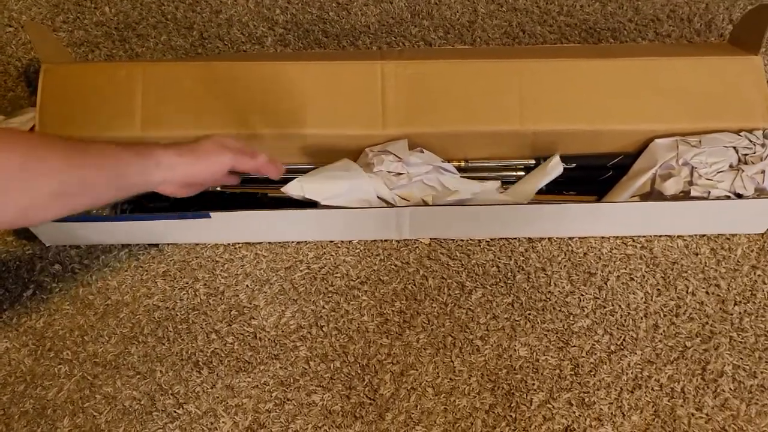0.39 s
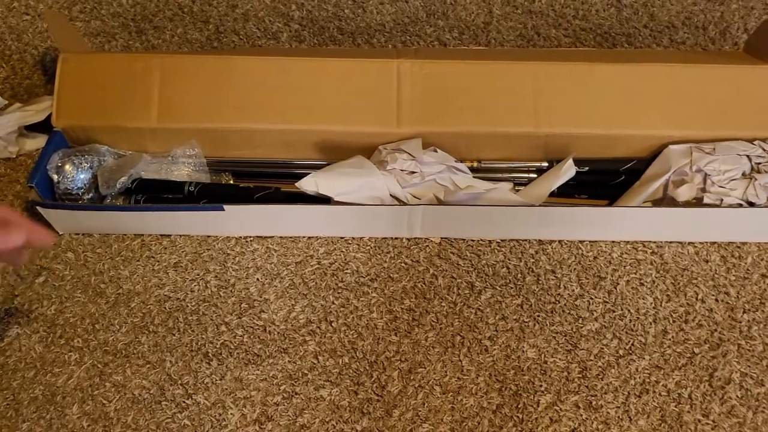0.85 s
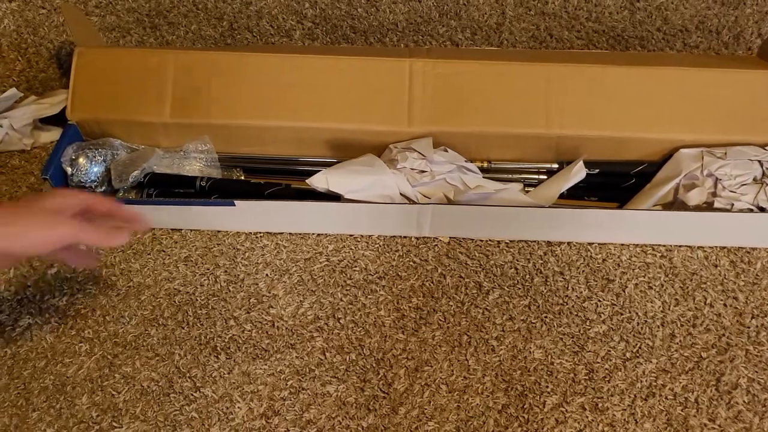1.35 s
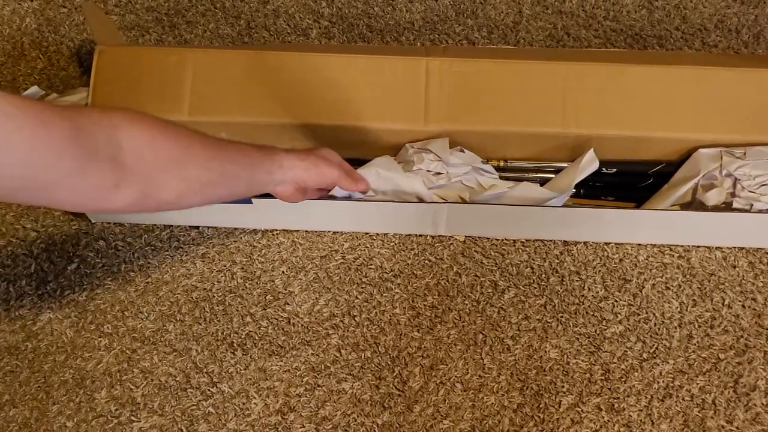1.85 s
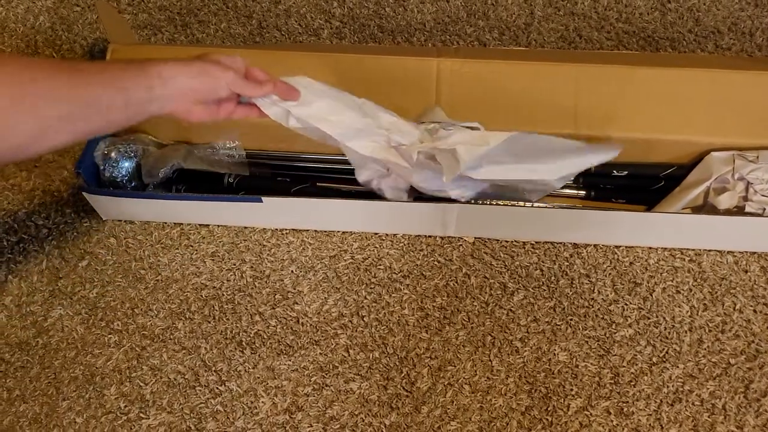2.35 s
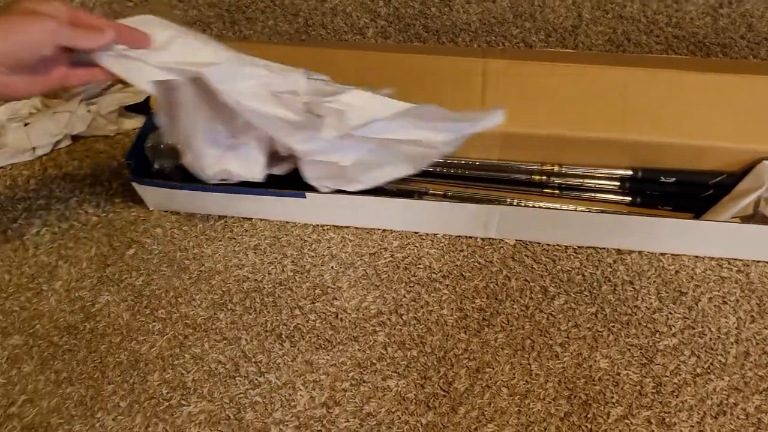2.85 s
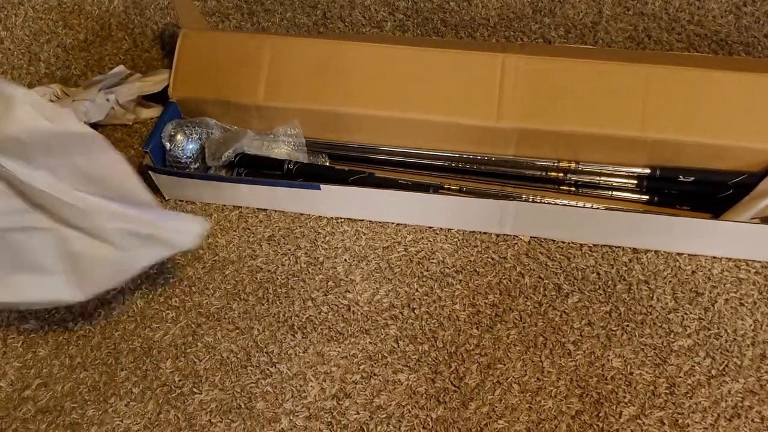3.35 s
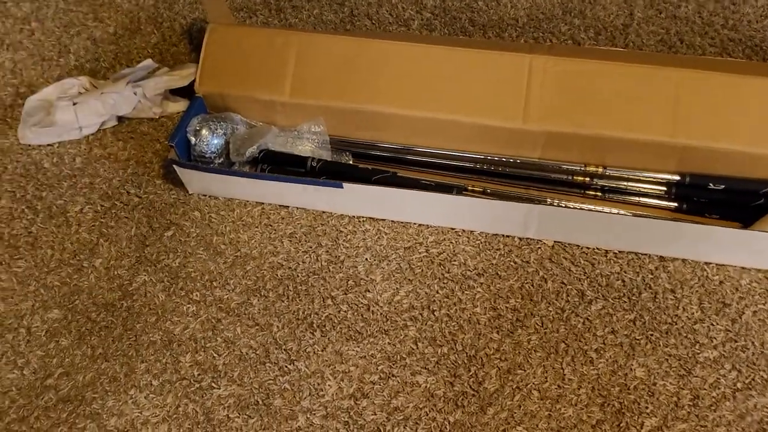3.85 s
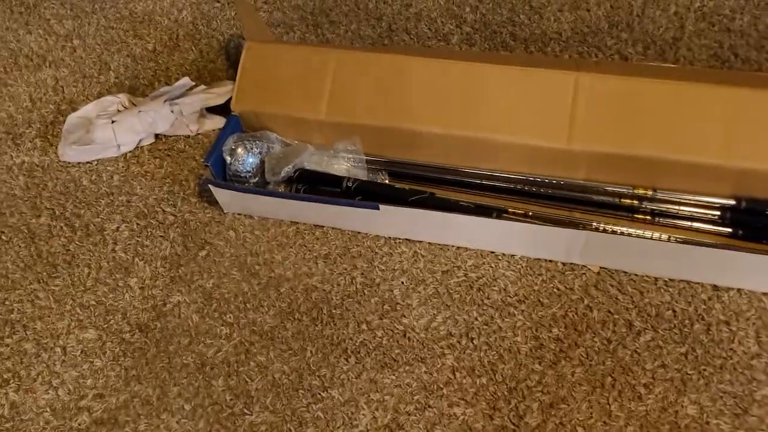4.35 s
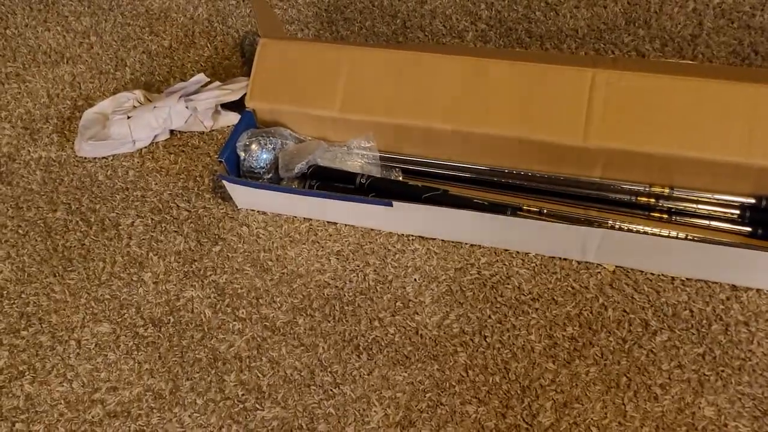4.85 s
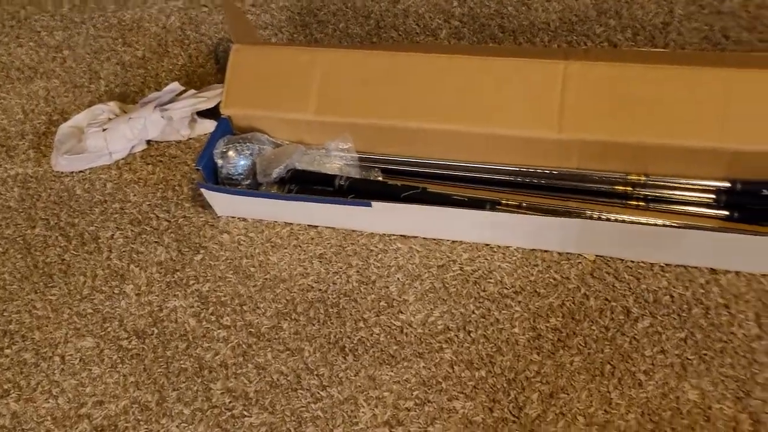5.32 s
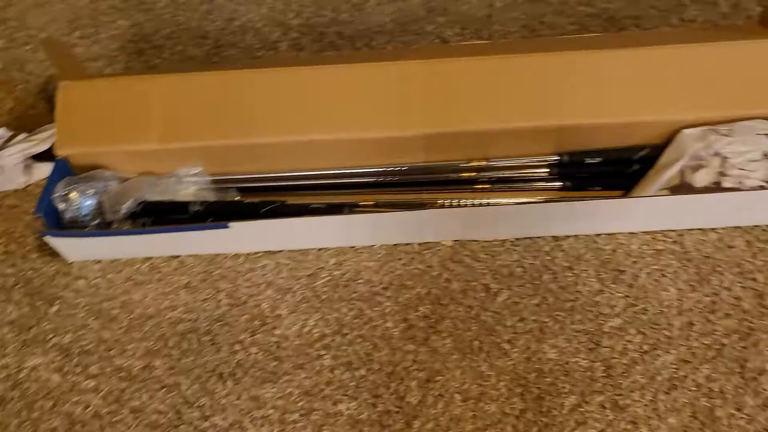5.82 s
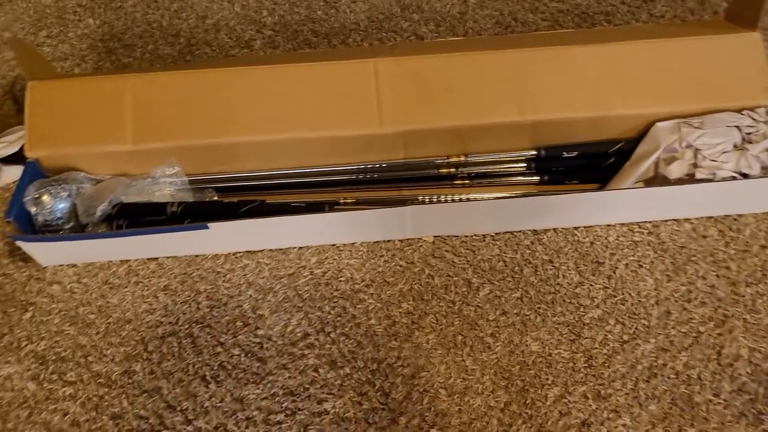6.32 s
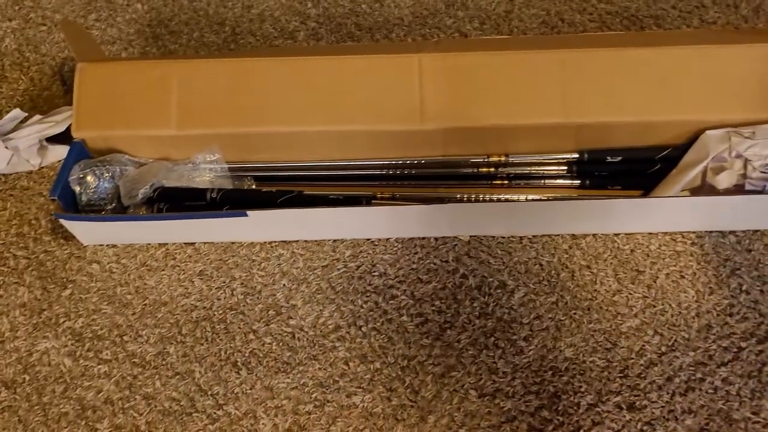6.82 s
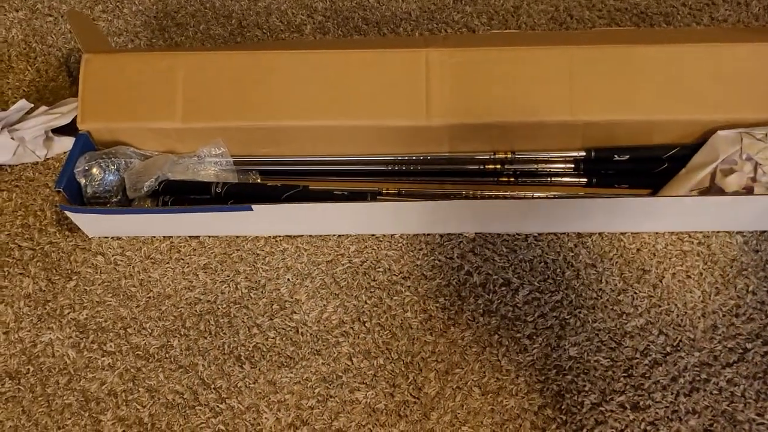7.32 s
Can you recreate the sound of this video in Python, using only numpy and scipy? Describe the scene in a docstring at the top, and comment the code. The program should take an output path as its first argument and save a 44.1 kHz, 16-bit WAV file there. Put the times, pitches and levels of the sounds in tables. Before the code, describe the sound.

Close, crisp paper crinkling with sharp snaps and dull box bumps, then scattered light ticks and soft knocks over faint room hum.

```python
"""A quiet furnished room hums and rumbles under two faint tones, then packing paper bursts into crackle.
A hand pulls it crumpled out of a long cardboard box on a carpet, close to a pair of microphones.
Creases are banded noise in clumps of tiny cracks and louder snaps; stiff flats of paper are brief rings.
Thumps of the box are pairs of decaying sines, squeaks are fluttering sines, and the house is shaped noise
with a wavering hum. A short dense echo surrounds the paper and the box."""
import sys
import numpy as np
from scipy import signal
from scipy.fft import rfft, irfft, next_fast_len
from scipy.io import wavfile
from scipy.ndimage import uniform_filter1d

SR = 44100
rng = np.random.default_rng(int(sys.argv[2]) if len(sys.argv) > 2 else 0)


def master_out(mix):
    """Clip the mix to full scale and print it as 16-bit PCM to the path in sys.argv[1]."""
    frames = np.transpose(np.atleast_2d(mix))
    ceiling = np.clip(frames, -1, 1)
    pcm = np.round(ceiling * 32767).astype(np.int16)
    wavfile.write(sys.argv[1], SR, pcm)


def volts(x):
    """Linear amplitude factor 10**(x/20) for a level x in dB, scalar or array-like."""
    e = np.asarray(x, float) / 20
    return 10 ** e


N = 339129   # length in samples


def unit_rms(x):
    """Scale a signal to unit rms."""
    return x / np.sqrt(np.mean(x ** 2) + 1e-20)


def at_hz(points, hz):
    """Read a (Hz, value) table on a log-frequency axis."""
    table_hz, values = np.transpose(points)
    return np.interp(np.log(hz), np.log(table_hz), values)


def drift(rate_hz):
    """Random wander of unit rms: noise through a two-pole low-pass, made at 200 points a second."""
    control_rate, settle = 200, 400
    steps = int(N / SR * control_rate) + settle + 2
    r = np.exp(-2 * np.pi * rate_hz / control_rate)
    slow = signal.lfilter([1], [1, -2 * r, r * r], rng.standard_normal(steps))[settle:]
    return np.interp(np.arange(N) * control_rate / SR, np.arange(len(slow)), unit_rms(slow))


def die(clicks, t60_s):
    """Turn every click into a jump that dies away exponentially by 60 dB in t60_s."""
    return signal.lfilter([1], [1, -volts(-60 / (t60_s * SR))], clicks + 1e-18)


def pair(noise, alike):
    """Mix two unrelated noises into left and right with the given likeness (correlation)."""
    alike = np.clip(alike, -.99, .99)
    shared = np.sqrt(1 + alike) * noise[0]
    opposed = np.sqrt(1 - alike) * noise[1] * np.array([[1], [-1]])
    return (shared + opposed) / np.sqrt(2)


def panned(db):
    """Gains of left and right for a left-right level difference in dB."""
    return volts(np.array([db / 2, -db / 2]))


# Colour of the room's bed of noise. Each row: frequency in Hz, relative density in dB per Hz.
HOUSE_COLOUR = [(20, -9), (40, -7), (65, 12), (100, 3.5), (150, -11), (230, -4.5), (400, -5.5), (900, -16),
                (2400, -21), (4000, -46.5), (7500, -19.5), (8600, -45.5), (16000, -50)]
# Stereo width of that bed. Each row: frequency in Hz, left-right likeness from -1 to 1.
HOUSE_LIKENESS = [(60, .96), (150, .9), (380, .9), (950, -.3), (2380, -.6), (5980, 0), (15000, .25)]
# Hum tones. Each row: frequency in Hz, middle level in dB, rate of the level's waver in Hz.
HUM_TONES = [(125.5, -70.5, 6), (239.3, -63, 10)]


def house(waver_db=2.5):
    """Rumble and hiss as noise shaped in frequency, under sines whose level and phase wander."""
    size = next_fast_len(N)
    hz = np.maximum(np.arange(size // 2 + 1) * SR / size, 1)
    spectra = rfft(rng.standard_normal((2, size))) * volts(at_hz(HOUSE_COLOUR, hz))
    bed = irfft(pair(spectra, at_hz(HOUSE_LIKENESS, hz)), size)[:, :N]
    out = volts(-59.5) * unit_rms(bed)
    for hum_hz, db, waver_hz in HUM_TONES:
        level = volts(db + waver_db * drift(waver_hz))
        phase = 2 * np.pi * hum_hz * np.arange(N) / SR + 1.2 * drift(3.8)
        out += level * np.sin(phase)
    return out


def room(x, shared_hz=600):
    """Dense echoes after a short gap; long waves reach both sides alike and the treble dies first."""
    t60_s, treble_t60_s, gap_s, level_db = 0.36, 0.13, .004, -9
    t = np.arange(SR // 2) / SR
    echoes = rng.standard_normal((2, len(t))) * (t > gap_s)
    bass = signal.sosfilt(signal.butter(2, shared_hz, fs=SR, output="sos"), echoes)
    echoes[1] += bass[0] - bass[1]   # the right side takes the left side's bass
    dull = signal.lfilter([.35], [1, -.65], echoes)
    treble = echoes - dull
    tail = dull * volts(-60 * t / t60_s) + treble * volts(-60 * t / treble_t60_s)
    tail /= np.sqrt(np.sum(tail ** 2) / 2)
    return volts(level_db) * signal.fftconvolve(x, tail, axes=1)[:, :N]


# Faint short tones. Each row: start in seconds, pitch in Hz, relative level in dB, length in seconds.
SQUEAK_TONES = [(0.0, 1560, -66, 0.12), (0.01, 2930, -73, 0.11), (1.237, 4530, -53.5, 0.01),
                (2.93, 1475, -40.5, 0.043), (3.058, 295, -47, 0.03), (6.676, 2300, -53, 0.019)]


def squeaks(rough=.4):
    """Soft sines under a half-sine swell, with a quick random flutter of the level."""
    out = np.zeros(N)
    for s, hz, db, length in SQUEAK_TONES:
        t = np.arange(int(length * SR)) / SR
        i = round(s * SR)
        swell = np.sin(np.pi * t / length)
        out[i:i + len(t)] += volts(db) * swell * np.sin(2 * np.pi * hz * t)
    return out * (1 - rough + rough * drift(60))


# Dull knocks on the cardboard. Each row: start in seconds, relative level in dB, lower mode in Hz.
BOX_KNOCKS = [(0.157, -41, 324), (0.699, -39.5, 106), (2.158, -23.5, 330), (2.448, -35, 315),
              (3.148, -38.5, 481), (4.39, -34, 97), (4.629, -38, 579), (5.605, -36, 93), (5.651, -34, 73.5),
              (5.927, -47.5, 450), (6.265, -45, 480), (6.27, -39.5, 233), (6.284, -46, 382),
              (7.079, -36, 269), (7.096, -34, 337), (7.119, -36.5, 369), (7.139, -54, 415),
              (7.211, -34.5, 310), (7.239, -35.5, 177), (7.341, -38, 436), (7.369, -39, 447),
              (7.428, -33, 353), (7.449, -47, 396), (7.598, -41.5, 330)]


def thumps(slap_db=-14):
    """A push sets two neighbouring panel modes of the box ringing, with a short slap on top."""
    t60_s = 0.08
    out, t = np.zeros(N), np.arange(SR // 4) / SR
    slap_band = signal.butter(2, [500, 1800], "band", fs=SR, output="sos")
    slap = unit_rms(signal.sosfilt(slap_band, rng.standard_normal(N)))
    detunes = rng.uniform(1.18, 1.497, len(BOX_KNOCKS))   # upper mode over lower mode
    for (s, db, hz), detune in zip(BOX_KNOCKS, detunes):
        i = round(s * SR)
        part = t[:N - i]
        ring = np.sin(2 * np.pi * hz * part) + 0.72 * np.sin(2 * np.pi * hz * detune * part)
        swell = 1 - np.exp(-part * hz)   # deep thumps swell more slowly
        push = volts(db - 1 - 60 * part / t60_s) * swell
        slap_gain = volts(slap_db) * (hz / 300) ** 2
        out[i:i + len(t)] += push * (ring + slap_gain * slap[i:i + len(t)])
    return out


# How hard the paper is worked. Each row: time in seconds, relative effort in dB, brightness in dB
# (thin sharp creases are bright, broad folds dull).
PAPER_EFFORT = [(0.0, -59.5, -12), (0.127, -64, -8), (0.15, -38, -12.5), (0.183, -28.5, -0.5),
                (0.254, -31, -3.5), (0.282, -29.5, -3), (0.409, -25, -4.5), (0.444, -33, 0.5),
                (0.471, -25, -3.5), (0.519, -55, 8.5), (0.673, -73.5, 2), (0.738, -65.5, -4),
                (0.776, -63, -4), (0.923, -72, -2), (1.3, -76, 0), (1.823, -69, -4), (1.833, -48, -1),
                (1.862, -38, 0), (1.887, -26.5, 5), (1.968, -28.5, -2), (2.003, -28, 2), (2.028, -21.5, -5),
                (2.08, -22.5, -4), (2.148, -18.5, -4.5), (2.362, -25.5, -1.5), (2.458, -19.5, -4),
                (2.559, -30, -2.5), (2.589, -28.5, -0.5), (2.644, -20.5, -5), (2.691, -33.5, -3),
                (2.761, -39, 0.5), (2.913, -42.5, 1), (3.028, -44.5, 1), (3.139, -35.5, -2.5),
                (3.225, -49.5, 0), (3.274, -47.5, 5.5), (3.43, -57.5, 3.5), (3.554, -48.5, 0),
                (3.637, -38, 3.5), (3.699, -49.5, 8.5), (3.72, -33, -1), (3.76, -36, 2),
                (3.851, -43.5, 4.5), (3.896, -41, 9), (3.929, -52, 9), (3.951, -43, 9), (3.99, -46, 6.5),
                (4.063, -40.5, 4.5), (4.123, -50, 8.5), (4.161, -42.5, -5.5), (4.275, -66.5, 2),
                (4.39, -66, -5), (4.495, -59.5, 1), (4.574, -69, 3), (4.599, -33.5, 2.5),
                (4.624, -34.5, -1), (4.714, -44.5, 4.5), (4.849, -58, 3.5), (5.019, -69, 2.5),
                (5.051, -64, 6), (5.123, -66, -2), (5.271, -63, -1), (5.335, -53, 2), (5.35, -51.5, 9),
                (5.42, -61.5, -3), (5.739, -61.5, -2), (5.912, -67, 1), (5.934, -52, -2),
                (5.994, -61.5, -3), (6.116, -66, -1.5), (6.176, -63.5, 1.5), (6.246, -74.5, 8.5),
                (6.419, -71, 0), (6.695, -67.5, 2), (7.056, -71.5, 4.5), (7.106, -56.5, 12),
                (7.174, -60, 1), (7.251, -50, 2.5), (7.285, -59.5, 0), (7.325, -64, 2), (7.348, -41, -5),
                (7.456, -58, 7.5), (7.488, -48, 8), (7.608, -42.5, 4.5), (7.688, -49, 3.5)]
# How much the paper drags on the cardboard, which adds body. Each row: time in seconds, drag in dB.
BOX_DRAG = [(0, -10), (0.15, 3), (0.19, -4.5), (0.47, 2.5), (0.55, 1), (0.7, 9), (0.776, 2), (0.92, -1.5),
            (1.83, 0.5), (1.9, 4.5), (2.15, 1), (2.36, 0), (2.8, -3.5), (3.14, 1), (3.55, 1.5),
            (3.72, -3.5), (4.1, 2.5), (4.16, 0.5), (4.39, 5), (4.62, 1.5), (4.85, -2), (5.12, 4),
            (5.42, -7), (5.74, 1.5), (5.95, -6), (6.29, 5), (6.7, -0.5), (7.1, 3.5), (7.35, 7.5), (7.49, 8),
            (7.69, 0)]
# Where the paper is heard. Each row: time in seconds, left-right difference in dB, treble in dB
# (more when it faces the microphone ports, less when hidden behind the box).
PAPER_PLACE = [(0, -0.5, 0.5), (1.8, -2, -2), (2.6, -2, 0), (2.9, -1, 5), (3.5, 0.5, -1.5), (4.1, -0.5, 0),
               (4.55, 0, -4.5), (5.4, -2, -5), (5.8, -3, -1), (6.5, -5, 0), (6.9, -5, 4.5), (7.1, -6, -1),
               (7.69, -2.5, -3)]


def handling():
    """Effort, brightness, drag and place of the paper at every sample, turned into levels per band."""
    t = np.arange(N) / SR
    time_s, effort, brightness = np.transpose(PAPER_EFFORT)
    effort_db, bright = np.interp(t, time_s, effort), np.interp(t, time_s, brightness)
    drag = np.interp(t, *np.transpose(BOX_DRAG))
    time_s, side, facing = np.transpose(PAPER_PLACE)
    side_db, facing_db = np.interp(t, time_s, side), np.interp(t, time_s, facing)
    soft = -30 - effort_db   # dB below a full pull
    # band levels against the crinkle, in dB
    crisp_db = -4 + 0.0234 * soft + 0.87 * bright
    treble_db = -12 + .12 * soft + 1.14 * bright + 0.5 * drag + facing_db
    flex_db = -8.5 + 0.2939 * soft - 0.39 * bright + 0.68 * drag
    box_db = -11.5 + .5 * soft - 0.46 * bright + 0.98 * drag
    return effort_db, crisp_db, treble_db, flex_db, box_db, side_db


def facets(per_s=220, cycles=27.0, size_db=3.5, snap_ring_db=-7, crack_ring_db=3):
    """Stiff flats between creases ring briefly: cracks at one of twenty pitches, snaps at their own."""
    left_lag_s = 0.000352   # the ringing reaches the right port first
    crinkle_db, *others, side_db = handling()
    sizes = volts(crinkle_db + crack_ring_db - 12.5 + size_db * np.minimum(rng.exponential(1, N), 3))
    sizes *= (rng.random(N) < per_s / SR) * rng.choice([-1, 1], N)
    dealt, out = rng.integers(0, 20, N), np.zeros(N + SR)
    for k, hz in enumerate(np.geomspace(900, 5000, 20)):
        r, w = volts(-60 * hz / (cycles * SR)), 2 * np.pi * hz / SR   # 60 dB down after the given cycles
        strikes = sizes * (dealt == k) + 1e-18
        out[:N] += signal.lfilter([0, np.sin(w)], [1, -2 * r * np.cos(w), r * r], strikes)
    t = np.arange(SR // 12) / SR
    for s, db, hz, treble_db, t60 in CREASE_SNAPS:
        i = round(s * SR)
        ring_t60 = 0.69 * t60 + cycles / hz / 2
        out[i:i + len(t)] += volts(db + snap_ring_db - 60 * t / ring_t60) * np.sin(2 * np.pi * hz * t)
    late = np.interp(np.arange(N) - left_lag_s * SR, np.arange(N), out[:N])
    return np.array([late, out[:N]]) * panned(side_db)


# Creases that snap; the flats above ring with them too. Each row: start in seconds, relative level in dB,
# brightest frequency in Hz, extra treble in dB, base decay time (t60) in seconds.
CREASE_SNAPS = [(0.1508, -28.5, 7500, -9, .026), (0.1654, -24, 3880, -20, 0.0087),
                (0.1782, -10.5, 2780, 8.5, 0.0026), (0.1878, -15, 7540, 10, 0.0064),
                (0.2252, -19.5, 7550, -15, .018), (0.23, -18.5, 7200, -13, 0.028),
                (0.265, -25.5, 6250, 3, 0.13), (0.2732, -10.5, 1284, -15, 0.044),
                (0.2918, -18, 4900, -27, .012), (0.313, -17, 2540, -11, .007),
                (0.3775, -22, 1490, -13, .025), (0.3953, -22, 3050, -8, .026),
                (0.415, -12, 4000, -9, 0.024), (0.455, -22, 3000, -2.5, 0.023),
                (0.4619, -20, 3080, -4, 0.023), (0.764, -51, 2900, -20, 0.044),
                (0.778, -44, 1400, -26, 0.036), (1.8736, -5, 7730, -16, 0.011),
                (1.8801, -4.5, 4600, -7, 0.01), (1.911, -12.5, 5000, -12, 0.018),
                (1.9356, -10.5, 7300, -15, .0079), (1.9597, -16, 2940, -24, 0.013),
                (2.014, -14.5, 5650, -9, 0.066), (2.0348, -11, 6200, -12, 0.033),
                (2.147, -16, 3240, -22, .02), (2.207, -18, 2830, -14, 0.013),
                (2.225, -18.5, 3050, -14, .012), (2.243, -33, 3180, -9, 0.018),
                (2.3056, -21.5, 2540, -9, 0.043), (2.39, -18, 3140, -15, 0.032),
                (2.404, -14, 2740, -30, 0.02), (2.44, -29, 5500, -3, 0.035),
                (2.465, -19.5, 2570, -12, 0.072), (2.5784, -16.5, 1470, -20, 0.039),
                (2.593, -20, 5660, 7.5, 0.026), (2.6384, -11.5, 2360, -26, 0.016),
                (2.749, -27, 2690, -19, 0.038), (2.9326, -25.5, 2870, -21, 0.029),
                (2.946, -29, 5500, -13, 0.032), (3.183, -31, 1810, -3, 0.044),
                (3.2594, -26, 5600, -15, 0.017), (3.4178, -33.5, 1010, -37, .041),
                (3.4467, -35, 1310, -13, 0.028), (3.498, -26, 7100, -6, 0.019),
                (3.505, -20, 2060, -9, 0.0083), (3.5807, -32, 2200, 1, 0.017),
                (3.6246, -25, 1300, -45, 0.067), (3.6453, -34, 3040, -10, .023),
                (3.661, -25, 2070, -13, .011), (3.6887, -30, 1460, -14, 0.024),
                (3.72, -14, 6980, -2, 0.033), (3.7579, -27.5, 1050, 16, 0.0074),
                (3.787, -33, 7840, 26, .0076), (3.8078, -22, 5800, 6, 0.022),
                (3.868, -23.5, 5970, 18, 0.0095), (3.879, -30, 1320, 3, .0081),
                (3.9076, -24, 4750, -11, .026), (3.939, -27.5, 3720, -6, 0.067),
                (3.9444, -32, 4880, -10, .048), (4.0003, -25, 6000, -6, 0.01),
                (4.0059, -24.5, 1020, -13, .021), (4.022, -29.5, 5840, 6, 0.038),
                (4.079, -14.5, 4830, -10, .017), (4.1012, -17, 3460, -16, .006),
                (4.111, -32, 2630, 8, 0.01), (4.151, -27, 910, -4, 0.023), (4.3073, -51, 4770, -1, 0.097),
                (4.5893, -30.5, 5600, -15, 0.064), (4.732, -33, 4440, -9, 0.073),
                (5.0385, -32, 6400, -7, 0.0053), (5.0555, -40, 6720, -6, .0088),
                (5.3416, -28, 5360, -1, 0.013), (5.347, -34, 3040, -10, 0.021),
                (5.5838, -51, 1120, -30, .075), (5.923, -42.5, 2270, -26, 0.024),
                (5.928, -25, 6950, -24, 0.02), (6.175, -56, 4500, -23, .03), (6.6945, -45, 2430, -13, .014),
                (6.7925, -44, 2600, -16, 0.014), (7.0968, -36, 4350, 1, 0.025),
                (7.264, -26, 3480, -23, 0.0023), (7.276, -42, 910, -12, .0091),
                (7.3709, -23, 3530, -28, 0.013), (7.3839, -17.5, 4360, -31, .0064),
                (7.415, -37, 1530, -18, 0.0087), (7.4327, -31.5, 2970, -7, 0.019),
                (7.5522, -20, 4730, -14, 0.011), (7.5937, -23, 4900, -21, 0.0099),
                (7.6281, -22, 4900, -17, .006)]
# Bands of box, flex, crinkle, crispness and treble. Each row: centre in Hz, width in Hz.
BODY_BANDS = [(290, 340), (850, 750), (2100, 2200), (5100, 4000), (11500, 7000)]
# Colour of the cracks and sliding paper. Each row: frequency in Hz, gain in dB.
PAPER_COLOUR = [(70, -13.5), (130, -15.5), (280, -1.5), (600, -6.5), (1300, -6), (3000, -3), (7000, 2.5),
                (15000, -2)]
# Side balance; the right port faces the paper. Each row: frequency in Hz, left-right difference in dB.
SIDE_BALANCE = [(200, 3), (1500, 3), (5000, -1), (15000, -8)]
# Stereo width of the paper. Each row: frequency in Hz, left-right likeness from -1 to 1.
PAPER_LIKENESS = [(60, .95), (250, .92), (550, .1), (1300, .5), (2500, .4), (5000, .08), (15000, 0)]


def rustle(per_s=600, clump_db=4.5, cycles=3.9, patch_db=1.5):
    """Cracks and snaps are short noise bursts, each with its own colour; sliding sheets fill the gaps."""
    slide_share, gentle_db = 1.05, -44   # below gentle_db of effort the sheets slide more than they crack
    crack_s, crack_size_db, crack_colour_db = .006, 2.2, 5.8   # base t60, spread of size, spread of colour
    snap_slope_db, snap_rise_s = 6, .00015   # dB per octave off the brightest, time constant
    crinkle_db, crisp_db, treble_db, flex_db, box_db, side_db = handling()
    when, peak_db, bright_hz, snap_treble_db, snap_t60 = np.transpose(CREASE_SNAPS)
    snap_flex_db = -5 - 4 * np.log2(bright_hz / 1000)   # higher snaps flex the sheet less
    after = np.arange(SR // 12)
    after_s = after / SR
    at = np.round(when * SR).astype(int)[:, None] + after
    # cracks come in clumps
    born = np.flatnonzero(rng.random(N) < per_s * volts(clump_db * drift(9.0)) / SR)
    sizes_db = crack_size_db * np.minimum(rng.exponential(1, N), 3)[born]
    edges = 65 * 2 ** np.arange(0, 8.1, .5)   # half-octave bands, Hz
    white = rng.standard_normal((2, 2, N))   # neighbouring bands take turns with two noise pairs
    slide = slide_share * volts(np.clip(gentle_db - crinkle_db, 0, 12))
    break_off = 1 + 0.92 * np.exp(-after_s / 0.00015)   # the crease gives way with a sharp tick
    centres, widths = np.transpose(BODY_BANDS)
    out = 0
    for k, (low, high) in enumerate(zip(edges, edges[1:])):
        hz = np.sqrt(low * high)
        # weight of each body band at this frequency
        box, flex, crinkle, crisp, treble = [np.interp(np.log(hz), np.log(centres), row) for row in np.eye(5)]

        cracks = np.zeros(N)
        cracks[born] = volts(sizes_db + crack_colour_db * rng.standard_normal(N)[born])
        grain = slide + die(cracks, crack_s + cycles / hz)   # lows ring longer
        grain /= np.sqrt(uniform_filter1d(grain ** 2, size=3000))   # the hand sets the loudness
        grain *= volts(patch_db * drift(5.1))   # the colour wanders
        body_width = np.exp(np.interp(np.log(hz), np.log(centres), np.log(widths)))
        share_db = 10 * np.log10((high - low) / body_width)
        moving_db = crinkle_db + box * box_db + flex * flex_db + crisp * crisp_db + treble * treble_db
        level = grain * volts(moving_db - 2.5 + share_db + at_hz(PAPER_COLOUR, hz))

        octaves_off = np.abs(np.log2(hz / bright_hz))
        snap_db = peak_db - 16.0 - snap_slope_db * (crinkle + crisp) * octaves_off
        snap_db = snap_db + treble * snap_treble_db + (flex + box) * snap_flex_db - 14 * box
        snaps = np.zeros(N + len(after))
        fall = volts(snap_db[:, None] - 60 * after_s / (snap_t60[:, None] + 1.2 / hz))
        rise = 1 - np.exp(-after_s / snap_rise_s)
        np.add.at(snaps, at, fall * break_off * rise)

        noise = pair(white[k % 2], at_hz(PAPER_LIKENESS, hz)) * np.sqrt(SR / 2 / (high - low))
        band_filter = signal.butter(2, [low, high], "band", fs=SR, output="sos")
        band = signal.sosfilt(band_filter, noise * (level + snaps[:N]))
        out = out + band * panned(at_hz(SIDE_BALANCE, hz))[:, None]
    return out * panned(side_db)


def scene():
    """Paper and box in the room, over the house, which leans slightly left."""
    near = rustle() + facets() + thumps() + squeaks()
    return near + room(near) + house() * panned(.9)[:, None]


def low_pass(x):
    """Removes everything above the highest recorded frequency."""
    return signal.sosfilt(signal.butter(12, 17000, fs=SR, output="sos"), x)


def record(dry):
    """The microphone housing takes out part of one band and a steep low-pass cuts the top."""
    dip_hz, dip_width_hz, dip_db, cutoff_hz = 8830, 960, -8.5, 16300
    band = signal.lfilter(*signal.iirpeak(dip_hz, dip_hz / dip_width_hz, fs=SR), dry)
    dipped = dry - (1 - volts(dip_db)) * band
    mix = signal.sosfilt(signal.cheby2(12, 45, cutoff_hz, fs=SR, output="sos"), dipped)
    return low_pass(mix)


dry = scene()
out = record(dry)
master_out(out)
```